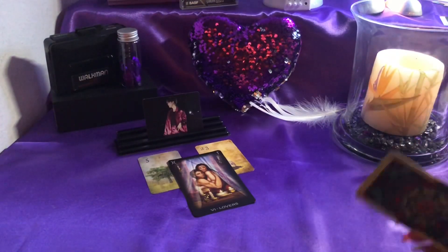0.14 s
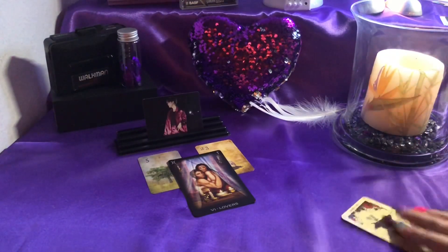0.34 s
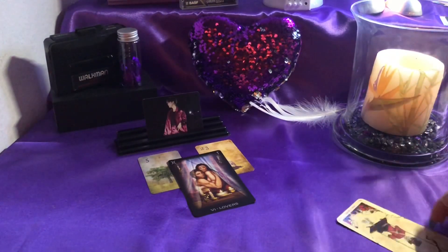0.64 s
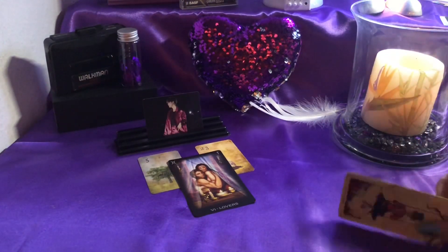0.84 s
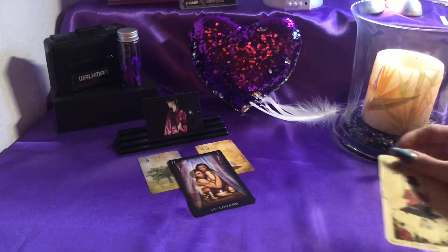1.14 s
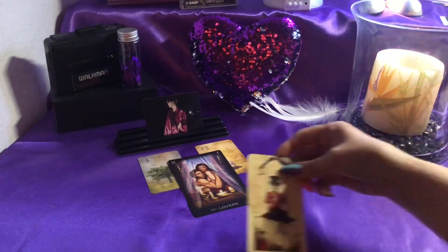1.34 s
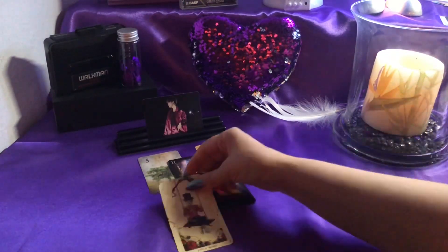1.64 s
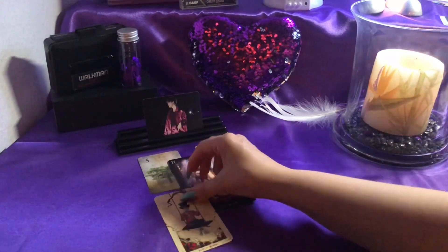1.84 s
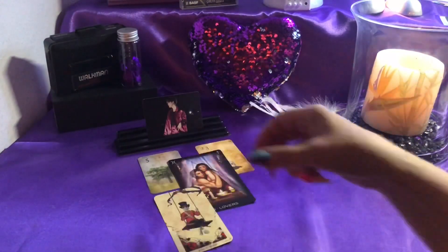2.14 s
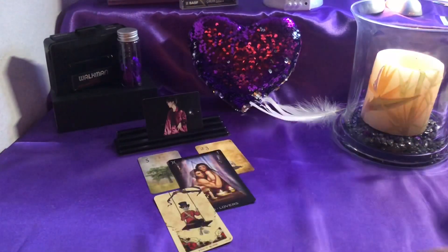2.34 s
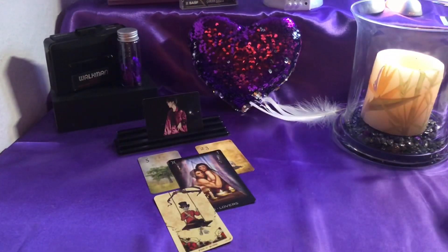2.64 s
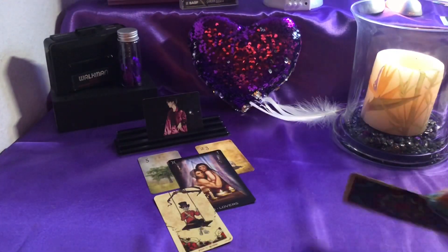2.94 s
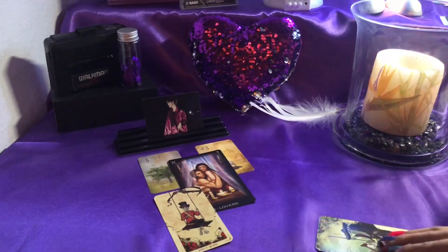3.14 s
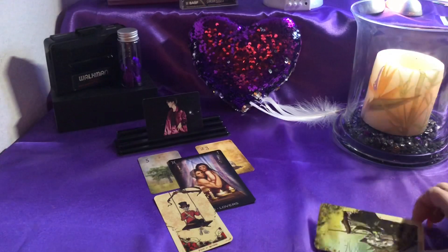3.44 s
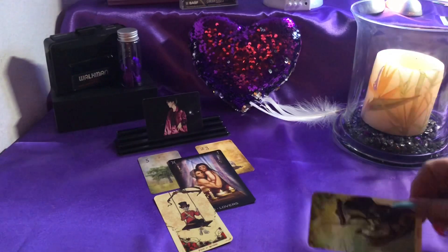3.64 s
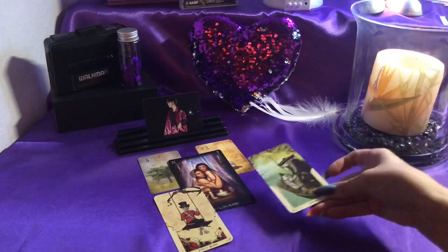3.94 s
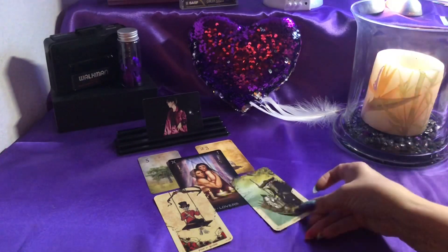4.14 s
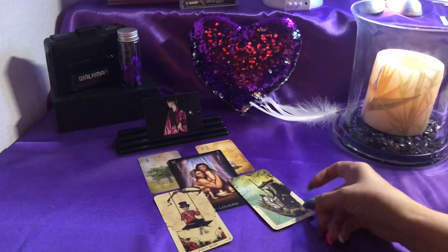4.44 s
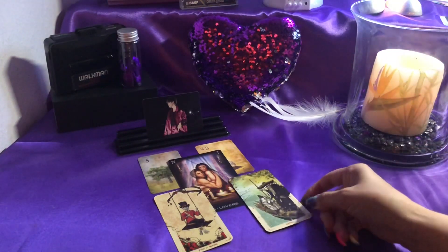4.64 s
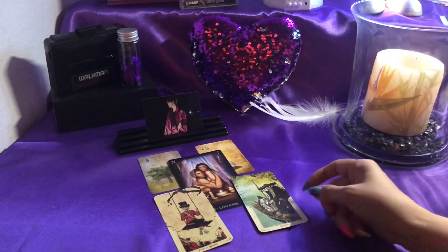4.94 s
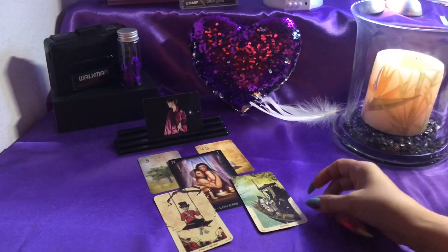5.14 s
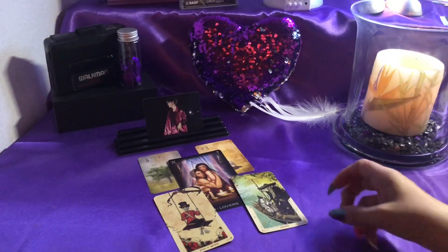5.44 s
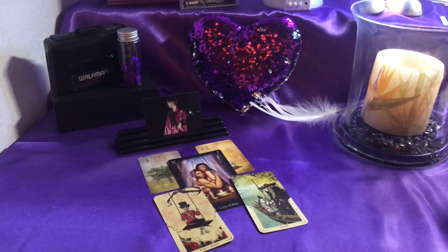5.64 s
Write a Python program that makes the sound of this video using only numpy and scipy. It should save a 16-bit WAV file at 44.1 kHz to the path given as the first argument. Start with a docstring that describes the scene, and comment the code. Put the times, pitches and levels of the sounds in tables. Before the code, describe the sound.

Two stiff paper cards slide off a deck with sharp snaps and ticks, then land softly on a cloth-covered table, with one low thump.

```python
"""A grainy hiss of sliding cards, sharp snaps, ticks, dull rustles and soft bumps, with one low thump.
Two tarot cards are drawn from a deck, turned over and laid on a satin-covered table in a small room.
Snaps and ticks are sharp pushes that ring the card; slides, strokes and rustles are coloured noise.
Bumps ring the table, a hollow rub fades away, and a short noise tail makes the room.
The thump and slow swells of air from the arm reach the close microphone without the room's tail."""
import sys
import numpy as np
from scipy import signal
from scipy.fft import rfft, irfft
from scipy.io import wavfile

SR = 44100
rng = np.random.default_rng(int(sys.argv[2]) if len(sys.argv) > 2 else 0)


def materialize(psi):
    """Save the field psi as 16-bit PCM at rate SR to the path in sys.argv[1].

    A 1-D psi becomes a single channel; in a 2-D psi each row is a channel.
    """
    bounded = np.clip(np.atleast_2d(psi).T, -1, 1)
    quanta = np.round(bounded * 32767).astype(np.int16)
    wavfile.write(sys.argv[1], SR, quanta)


N = 255780
TIME = np.arange(N) / SR   # seconds

# Levels below are relative; scene() also shifts those of slides, strokes, rustles, bumps,
# snaps, ticks and air, but not those of the thump or rub.

# Air stirred by the arm. Each row: time in seconds, level in dB.
DRAUGHT_LEVELS = [(0, -38), (1.05, -42.5), (1.25, -23.5), (1.7, -31.5), (2.3, -25), (2.7, -29.5),
                  (3.2, -36), (4.0, -32.5), (4.6, -51.5), (5.2, -47.5), (5.8, -26.5)]
# Slow air swells. Each row: frequency in Hz, relative level in dB.
DRAUGHT_COLOUR = [(.5, -19.0), (3, -3), (7, -9.5), (15, -25.5), (30, -46), (100, -59.5), (400, -96.0),
                  (2000, -140)]
# The room's steady rumble and hiss. Each row: frequency in Hz, relative level in dB.
ROOM_TONE_COLOUR = [(10, -1), (22, 0.5), (38, -6), (48, -9), (66, -10.5), (115, -31.5), (200, -41.5),
                    (500, -50.5), (900, -50), (2500, -55), (9000, -53.5), (16000, -66)]
ROOM_TONE_DB = -48   # before the setting in scene()

# A card slides over another. Each row: start in seconds, length in seconds,
# hiss of the faces in dB, scrape of the edge in dB.
CARD_SLIDES = [(0, 0.05, -45, -63), (0.112, 0.15, -59.5, -75), (0.565, 0.084, -58.5, -67),
               (0.73, 0.25, -61, -79), (1.025, 0.067, -58, -76), (1.171, 0.21, -55, -69),
               (1.418, 0.31, -62, -69), (1.926, 0.21, -64.5, -74.5), (2.222, 0.3, -59, -72),
               (2.612, 0.07, -51, -59), (2.744, 0.053, -49.5, -57.5), (3.478, 0.1, -57, -80),
               (3.625, 0.19, -59.5, -72), (3.852, 0.26, -71, -87), (5.223, 0.17, -63, -77),
               (5.486, 0.57, -65, -87)]
# Bright hiss of the faces. Each row: frequency in Hz, relative level in dB.
HISS_COLOUR = [(1760, -9), (3000, -10.5), (4000, -6.5), (6090, 0), (6810, 0), (8170, 0), (9660, -4.5),
               (12500, -19), (14300, -30), (16000, -45.5)]
# Duller scrape of the edge. Each row: frequency in Hz, relative level in dB.
SCRAPE_COLOUR = [(700, 9.5), (1300, 1), (2000, -1.5), (2900, 12.5), (3800, -21), (5500, -16)]
SLIDE_ATTACK_S, SLIDE_RELEASE_S = 0.024, 0.029
SURGE_DB, SURGES_PER_S = 1.53, 28   # a sliding card sticks and surges

# Rustle of the satin under the hand. Each row: time in seconds, level in dB.
RUSTLE_LEVELS = [(0.0, -86), (0.32, -64), (0.77, -67.5), (0.96, -72), (1.23, -75), (1.6, -61.5),
                 (1.86, -69.5), (2.53, -61), (3.03, -71.5), (3.19, -68.5), (3.39, -69.5), (3.7, -61.5),
                 (4.16, -79), (4.93, -75), (5.56, -70), (5.75, -66)]
# Dull sound of the cloth. Each row: frequency in Hz, relative level in dB.
CLOTH_COLOUR = [(90, -2), (160, 0), (300, 0), (550, -4), (900, -10.5), (1400, -17.5), (2500, -23)]

# Short firm strokes. Each row: loudest moment in seconds, length in seconds, level in dB, centre in Hz.
FIRM_STROKES = [(0.051, 0.034, -39.5, 9000), (0.37, 0.019, -44, 5200), (0.659, 0.02, -48.5, 6500),
                (0.937, 0.033, -48, 3270), (1.276, .025, -51, 5500), (2.422, 0.014, -55, 6500),
                (2.659, 0.045, -48.5, 10600), (3.386, 0.01, -41, 6500), (3.533, 0.043, -54, 11100),
                (3.719, 0.022, -59, 2800), (4.178, 0.017, -56.5, 4100), (5.5, 0.016, -67, 3230)]

# An edge touches a nail, the deck or another card.
# Each row: time in seconds, crack in dB, flex in dB, crack pitch in Hz.
EDGE_TICKS = [(0.0544, -37, -54, 8800), (0.2365, -49, -51, 5850), (0.6267, -49, -63, 6260),
              (0.8805, -30, -33, 6000), (0.9238, -45, -47, 5300), (0.9356, -43, -44.5, 5800),
              (1.2043, -52, -45.5, 8300), (1.3198, -48, -41, 5200), (1.3722, -39.5, -42.5, 6000),
              (1.6724, -32.5, -41.5, 5200), (2.4168, -44.5, -48, 5650), (2.4649, -46.5, -55, 7400),
              (2.912, -37, -38.5, 6500), (3.0524, -30, -33, 5800), (3.3106, -45, -66, 6900),
              (3.3695, -34, -61, 6500), (4.05, -42.5, -58, 5400), (4.1564, -48.5, -53, 4630),
              (4.176, -47, -59, 4300), (4.2143, -55, -64, 5200), (4.5349, -53.5, -59, 4964),
              (5.7741, -50.5, -53, 5500)]
TICK_BEND_HZ, TICK_FLAP_DB = 2600, -15   # flap is relative to the crack
# Tiny ticks while sliding: crack relative to the hiss, flex relative to the crack.
CATCHES_PER_S, CATCH_DB, CATCH_SPREAD_DB, CATCH_FLEX_DB, CATCH_HZ = 20, 0.5, 3.5, -4.5, 6500

# A bent card is flicked free. Each row: time in seconds, crack in dB, flex in dB, flap of the whole card
# in dB, crack pitch in Hz, bend pitch in Hz, time to settle in seconds, rebound relative to the crack in dB.
CARD_SNAPS = [(0.0811, -29, -27, -32, 6640, 2450, 0.019, -7),
              (0.3361, -19.5, -63, -41, 5890, 3200, 0.016, -9.5),
              (0.7844, -36, -55.5, -40.5, 4440, 3000, 0.0055, -1),
              (0.8344, -18, -24, -30, 6400, 2750, 0.0052, -15.5),
              (1.7731, -19.5, -24.5, -41, 6300, 2920, 0.018, -8.5),
              (2.81, -21, -25.5, -35, 6500, 2600, 0.017, -22.5),
              (3.019, -26.5, -29.5, -35, 6300, 1450, 0.0076, -18.5),
              (3.0577, -18.5, -42, -39.5, 5890, 2850, 0.012, -6.5)]
# A lighter first rebound comes part of the way through the settling.
FIRST_REBOUND_SHARE, FIRST_REBOUND_DB = .45, -6.5
REBOUND_FLEX_DB, REBOUND_FLAP_DB = -12.5, -4   # a rebound hardly bends the card but still flaps it
# Ringing of a card's edge. Each row: frequency in Hz, width in Hz, relative level in dB.
EDGE_RINGS = [(4100, 440, -11.5), (5930, 110, -9), (6114, 130, -9), (6740, 110, 3.5), (8040, 280, -5.5),
              (9760, 135, -11)]
# Ringing of a card's bends. Each row: frequency in Hz, width in Hz, relative level in dB.
BEND_RINGS = [(1450, 298, 4), (2457, 1650, 0), (3145, 112, 9.5), (4020, 1100, -13)]
# Ringing of a card's whole face. Each row: frequency in Hz, width in Hz, relative level in dB.
FACE_RINGS = [(129, 108, 1.5), (268, 170, -0.5), (443.6, 196, -0.5), (654, 210, -4), (1113, 560, -9)]

# Soft bumps on the padded table. Each row: time in seconds, peak in dB.
TABLE_BUMPS = [(0.178, -48), (0.556, -31), (0.735, -53), (1.565, -47), (1.789, -35.5), (2.649, -39.5),
               (3.01, -38.5), (3.337, -46.5), (4.533, -59)]
# Ringing of the table. Each row: frequency in Hz, width in Hz, typical relative level in dB.
TABLE_RINGS = [(200, 60.6, 1.5), (319, 40, -1), (423, 84, 0.5), (630, 78, -3), (850, 36, 0)]
BUMP_CONTACTS, BUMP_SETTLE_S, BUMP_LOSS_DB = 5, .016, 6.5   # a bump and four ever softer contacts

# Thump on the microphone. The one row: time in seconds, level in dB, recovery in seconds.
MIC_THUMP = (1.5148, -22.5, 0.022)

# A hollow rub that dies away as the second card comes off the deck.
RUB_START_S, RUB_DB, RUB_ATTACK_S, RUB_FADE_DB_PER_S = 3.04, -49, .02, 34.5
# Its sound. Each row: frequency in Hz, relative level in dB.
RUB_COLOUR = [(150, -14), (350, -6), (550, 0), (900, -5), (1250, -15), (1900, -18), (3000, -21),
              (7000, -16.5), (12000, -52.5)]

# How long the room rings. Each row: frequency in Hz, time to fall by 60 dB in seconds.
ROOM_DECAY = [(200, 0.19), (1000, 0.26), (3000, 0.25), (7000, 0.21), (14000, 0.21)]
CUTOFF_HZ = 16000


def from_db(db):
    """Turn decibels into gain."""
    return 10 ** (np.asarray(db) / 20)


def rms_one(x):
    """Scale to rms (average strength) 1."""
    return x / np.sqrt(np.mean(x ** 2) + 1e-20)


def unit_burst(x):
    """Scale to the energy of one millisecond at rms 1."""
    return x * np.sqrt(SR / 1000 / np.sum(x ** 2))


def at_hz(points, hz):
    """Read a table between its rows, with frequency on a log scale."""
    points = np.array(points)
    return np.interp(np.log(hz + 1e-9), np.log(points[:, 0]), points[:, 1])


def gain_curve(table, axis=1):
    """Join the rows of one dB column into a gain over time."""
    table = np.array(table)
    return from_db(np.interp(TIME, table[:, 0], table[:, axis]))


def drift(rate):
    """Wander at random with spread 1, through this many points per second."""
    knots = rng.standard_normal(int(N / SR * rate) + 2)
    return rms_one(np.interp(TIME * rate, np.arange(len(knots)), knots))


def colour(x, spectrum):
    """Shape a steady sound's balance of low and high, then scale to rms 1."""
    hz = np.arange(N // 2 + 1) * SR / N
    return rms_one(irfft(rfft(x) * from_db(at_hz(spectrum, hz)), N))


def butter(x, hz, kind, order=2):
    """Filter with a Butterworth filter that only looks back in time."""
    sos = signal.butter(order, np.clip(hz, 10, .45 * SR), kind, fs=SR, output="sos")
    return signal.sosfilt(sos, x)


def resonate(x, modes):
    """Ring several resonances side by side, with alternating signs."""
    out = 0
    for k, (hz, width, db) in enumerate(modes):
        r = np.exp(-np.pi * width / SR)   # a wider resonance dies sooner
        poles = [1, -2 * r * np.cos(2 * np.pi * hz / SR), r * r]
        ring = (1 - r * r) / 2 * signal.lfilter([1, 0, -1], poles, x)
        out = out + (-1) ** k * from_db(db) * ring
    return out


def add(out, s, sound):
    """Mix a short sound in at a time."""
    start = int(s * SR)
    out[start:start + len(sound)] += sound[:N - start]


def friction(per_s, grain_db, flutter_db):
    """Fibres catch and let go: dense tiny slips, a few larger ones, under uneven pressure."""
    catches = (rng.random(N) < per_s / SR) * rng.standard_normal(N)
    slips = rng.standard_normal(N) + from_db(grain_db) * rms_one(catches)
    return slips * from_db(flutter_db * drift(70))


def air(draught_db, tone_db):
    """Slow pressure swells from the moving arm over the room's steady rumble and hiss."""
    swell = colour(rng.standard_normal(N), DRAUGHT_COLOUR)
    tone = colour(rng.standard_normal(N), ROOM_TONE_COLOUR)
    draught = from_db(draught_db) * gain_curve(DRAUGHT_LEVELS) * swell
    return draught + from_db(ROOM_TONE_DB + tone_db) * tone


def slide_gain(axis):
    """Every slide swells, holds and dies away; its level comes from one dB column."""
    total = 0
    for row in CARD_SLIDES:
        swell = np.minimum(TIME - row[0], 0) / SLIDE_ATTACK_S
        fade = np.maximum(TIME - row[0] - row[1], 0) / SLIDE_RELEASE_S
        total = total + from_db(row[axis]) * np.exp(swell - fade)
    return total


def slides(hiss_db, scrape_db):
    """Card on card, in small surges: a bright hiss from the faces and a duller, grainier edge scrape."""
    hiss = from_db(hiss_db) * slide_gain(axis=2) * colour(friction(260, -5.5, 1.3), HISS_COLOUR)
    scrape = from_db(scrape_db) * slide_gain(axis=3) * colour(friction(200, -1.8, 3.9), SCRAPE_COLOUR)
    return (hiss + scrape) * from_db(SURGE_DB * drift(SURGES_PER_S))


def brushes(level_db):
    """Satin rustles dully under the hand as its fibres catch and slip."""
    return from_db(level_db) * gain_curve(RUSTLE_LEVELS) * colour(friction(90, -7, 2.2), CLOTH_COLOUR)


def strokes(level_db, spread):
    """A card pushed firmly for a moment swishes: friction in a band around a set pitch."""
    out, grain = np.zeros(N), friction(700, -2.056, 3.6)
    for s, length, db, hz in FIRM_STROKES:
        band = [hz / (1 + spread), hz * (1 + spread)]
        swish = butter(butter(grain, band, "band", order=1), hz * 0.99, "low")
        swish = rms_one(butter(swish, hz * 0.41, "high"))
        out += from_db(db + level_db) * np.exp(-2 * ((TIME - s) / length) ** 2) * swish
    return out


def contacts():
    """List snaps with two rebounds, ticks and chance catches: time, three levels and two pitches."""
    rows, ticks = [], list(EDGE_TICKS)
    for s, crack, flex, flap, hz, bend_hz, settle, rebound in CARD_SNAPS:
        rows.append((s, crack, flex, flap, hz, bend_hz))
        for share, db in ((FIRST_REBOUND_SHARE, FIRST_REBOUND_DB), (1, 0)):
            rows.append((s + share * settle, crack + rebound + db, flex + REBOUND_FLEX_DB + db,
                         flap + REBOUND_FLAP_DB + db, hz, bend_hz))

    # catches fall at random times and are as loud or faint as the slide beneath them
    hiss_db = 20 * np.log10(slide_gain(axis=2) + 1e-6)
    count = 200   # more than enough to fill the scene
    times = np.cumsum(rng.exponential(1, count)) / CATCHES_PER_S
    for s, luck in zip(times, rng.standard_normal(count)):
        if s < TIME[-1]:
            db = hiss_db[int(s * SR)] + CATCH_DB + CATCH_SPREAD_DB * luck
            ticks.append((s, db, db + CATCH_FLEX_DB, CATCH_HZ))

    for s, crack, flex, hz in ticks:
        rows.append((s, crack, flex, crack + TICK_FLAP_DB, hz, TICK_BEND_HZ))
    return rows


def scattered(x, level_db, decay_s):
    """Quick reflections from hand, deck and table, in a new random pattern each time."""
    t = TIME[:1500]
    hits = (rng.random(len(t)) < .15) * (t > .0007)   # none in the first 0.7 ms
    paths = rng.standard_normal(len(t)) * hits * np.exp(-t / decay_s)
    return x + from_db(level_db) * signal.fftconvolve(x, paths / np.linalg.norm(paths))[:len(x)]


def snaps(crack_db, flex_db, flap_db, ring_db, crack_width_hz, top_hz, chatter, chatter_s,
          bend_width_hz, bend_db):
    """At each contact a sharp push and brief chatter ring the card's edge, bends and whole face."""
    out, t = np.zeros(N), TIME[:3000]
    for s, crack, flex, flap, hz, bend_hz in contacts():
        release = (t == 0) + chatter * rng.standard_normal(len(t)) * np.exp(-t / chatter_s)
        edge = resonate(release, [(hz, crack_width_hz, 0)])
        edge = edge + from_db(ring_db) * resonate(edge, EDGE_RINGS)   # the stiff edge rings on for a few ms
        edge = butter(butter(edge, 2300, "high"), top_hz, "low", order=3)
        # the pitch of this extra bend depends on where the card is held
        grip = resonate(release, [(bend_hz, bend_width_hz, bend_db)])
        bend = butter(resonate(release, BEND_RINGS) + grip, 4960, "low")
        face = butter(resonate(release, FACE_RINGS), 1675, "low")
        snap = from_db(crack + crack_db) * unit_burst(edge)
        snap = snap + from_db(flex + flex_db) * unit_burst(bend)
        snap = snap + from_db(flap + flap_db) * unit_burst(face)
        add(out, s, scattered(snap, level_db=-4.5, decay_s=0.00615))
    return out


def bumps(level_db, soft_hz):
    """The cloth softens each contact before it rings the table."""
    out = np.zeros(N)
    push = butter(1.0 * (TIME[:4096] == 0), soft_hz, "low")
    for s, db in TABLE_BUMPS:
        for k in range(BUMP_CONTACTS):
            # each contact rings the table's resonances in slightly different strengths
            extras = rng.normal(0, 2.0, len(TABLE_RINGS))
            modes = [(hz, width, mode_db + extra) for (hz, width, mode_db), extra in zip(TABLE_RINGS, extras)]
            knock = resonate(push, modes)
            gain = from_db(db - k * BUMP_LOSS_DB + level_db)
            add(out, s + k * BUMP_SETTLE_S, gain * knock / np.abs(knock).max())
    return out


def thump(edge_hz):
    """A sudden step of pressure that leaks away, with its sharp front rounded off."""
    s, db, recovery = MIC_THUMP
    out = np.zeros(N)
    add(out, s, -from_db(db) * np.exp(-TIME[:8192] / recovery))
    # the tiny offset keeps the filter clear of extremely small numbers
    return butter(butter(out + 1e-18, edge_hz, "low", order=1), 4300, "low", order=4)


def rub():
    """A smooth hollow rub: friction that sets in quickly and fades steadily."""
    age = np.maximum(TIME - RUB_START_S, 0)
    gain = from_db(RUB_DB - RUB_FADE_DB_PER_S * age) * (1 - np.exp(-age / RUB_ATTACK_S))
    return gain * colour(friction(600, -13, 1.1), RUB_COLOUR)


def room(x, tail_db, build_s):
    """A small furnished room: a short noise tail whose bands die at their own speeds."""
    t = TIME[:SR // 2]
    edges = np.geomspace(100, 18000, 9)
    tail = np.zeros(len(t))
    for low, high in zip(edges, edges[1:]):
        band = butter(rng.standard_normal(len(t)), [low, high], "band")
        tail += band * from_db(-60 * t / at_hz(ROOM_DECAY, np.sqrt(low * high)))
    tail *= 1 - np.exp(-t / build_s)
    return x + from_db(tail_db) * signal.fftconvolve(x, tail / np.linalg.norm(tail))[:N]


def scene():
    """Put the cards and table in the room, and the air and thump right at the microphone."""
    sliding = slides(hiss_db=-2.5, scrape_db=-0.5) + strokes(level_db=-1.5, spread=0.4) + rub()
    cloth = brushes(level_db=1.0) + bumps(level_db=1.0, soft_hz=880)
    near = thump(edge_hz=760) + air(draught_db=4.5, tone_db=1.4)
    cards = snaps(crack_db=1.5, flex_db=-0.5, flap_db=3.0, ring_db=-13.0, crack_width_hz=2660, top_hz=10580,
                  chatter=0.1, chatter_s=0.002, bend_width_hz=554, bend_db=11.0)
    return (room(cards + sliding + cloth, tail_db=-11, build_s=0.00186) + near)[None]


def record(dry):
    """Cut the top steeply with an elliptic low-pass filter."""
    return signal.sosfilt(signal.ellip(10, .1, 80, CUTOFF_HZ, fs=SR, output="sos"), dry)


dry = scene()
out = record(dry)
materialize(out)
```